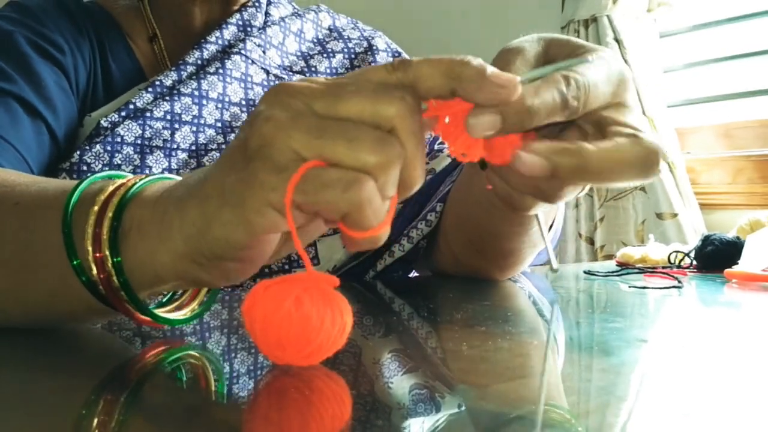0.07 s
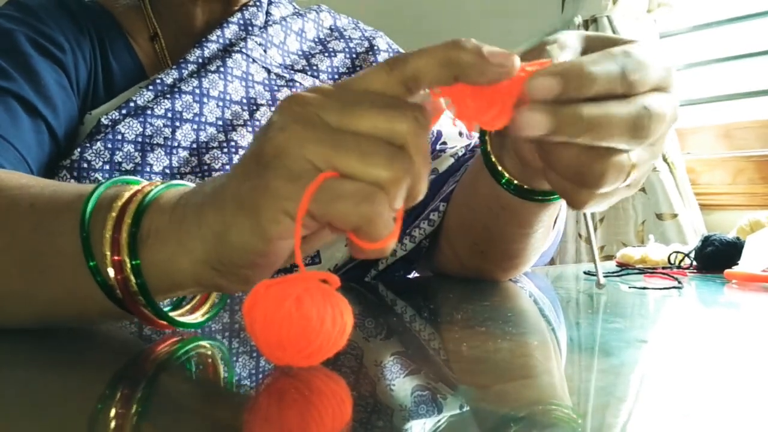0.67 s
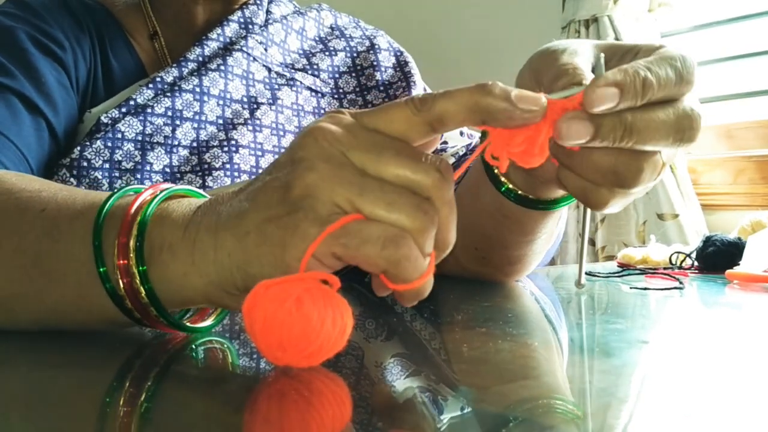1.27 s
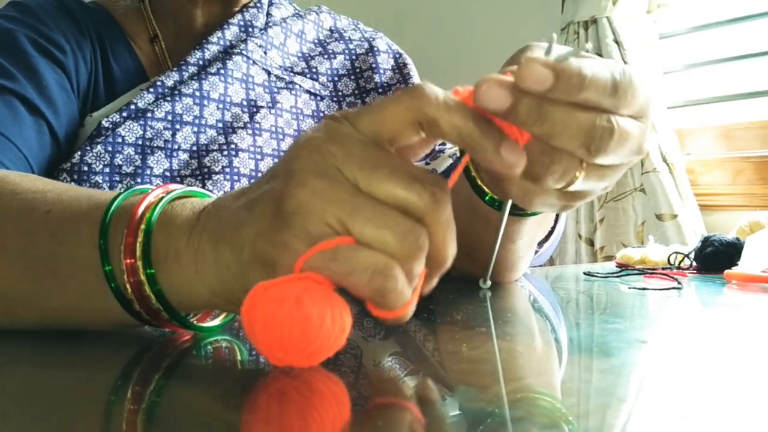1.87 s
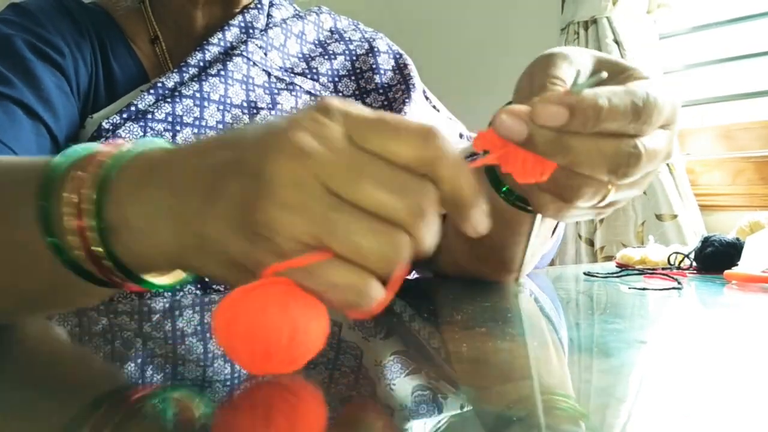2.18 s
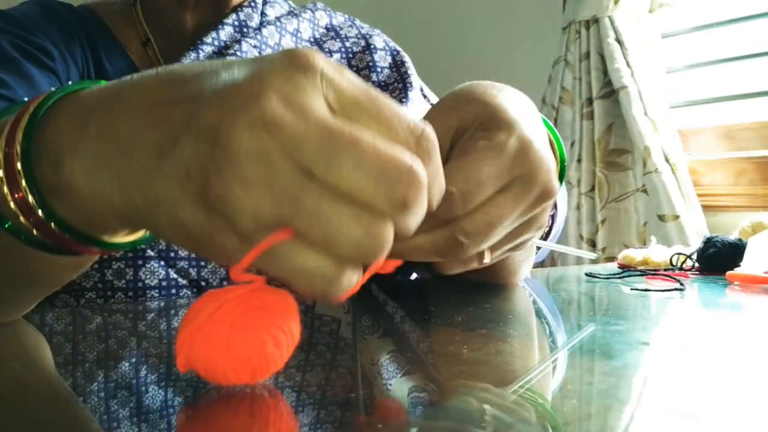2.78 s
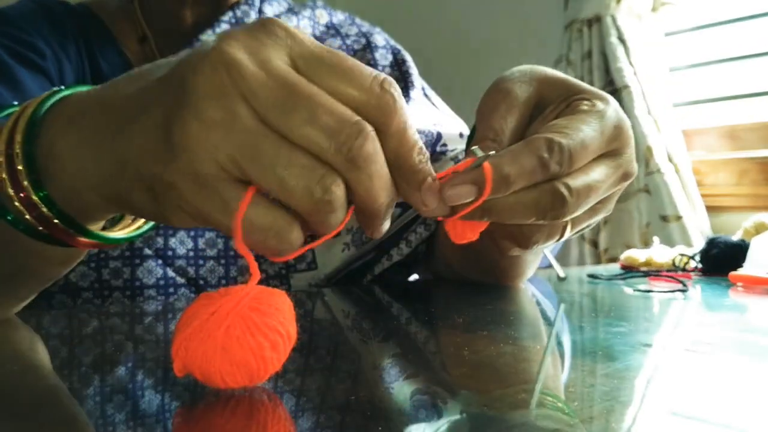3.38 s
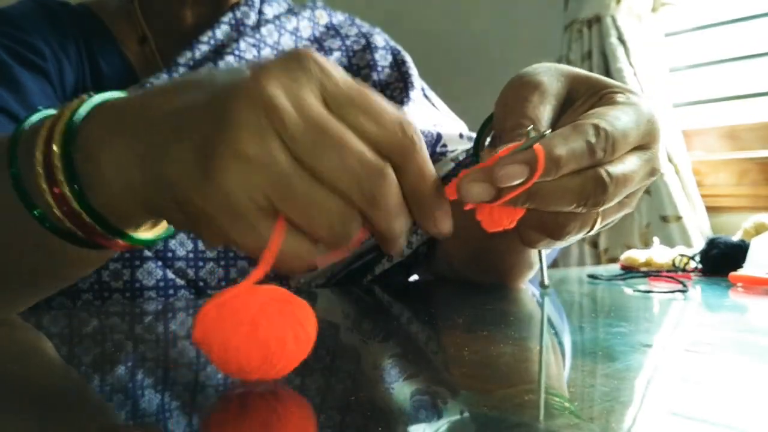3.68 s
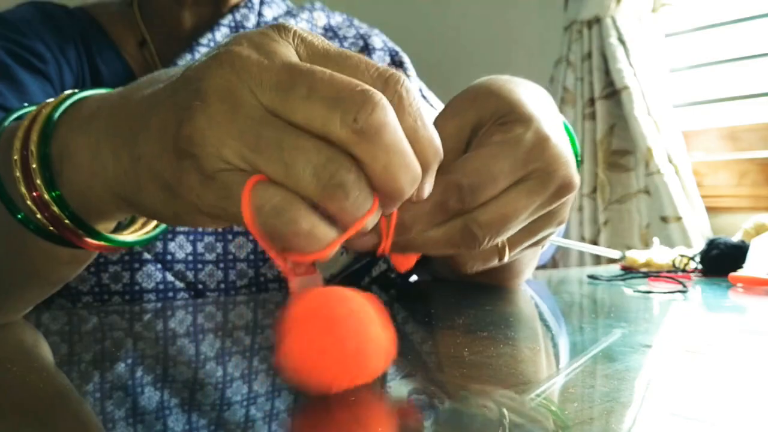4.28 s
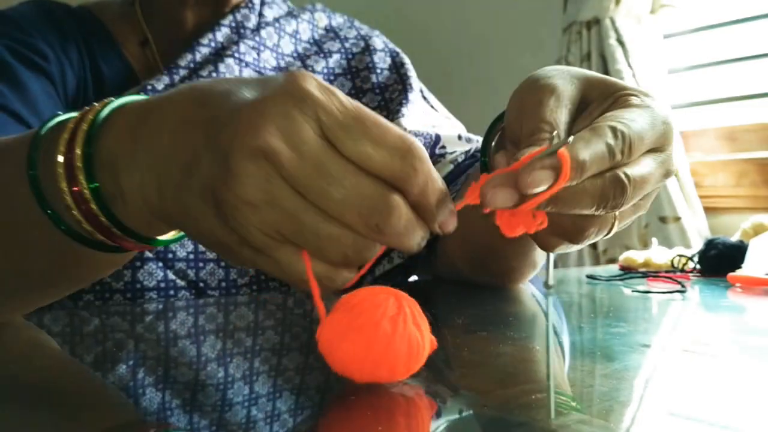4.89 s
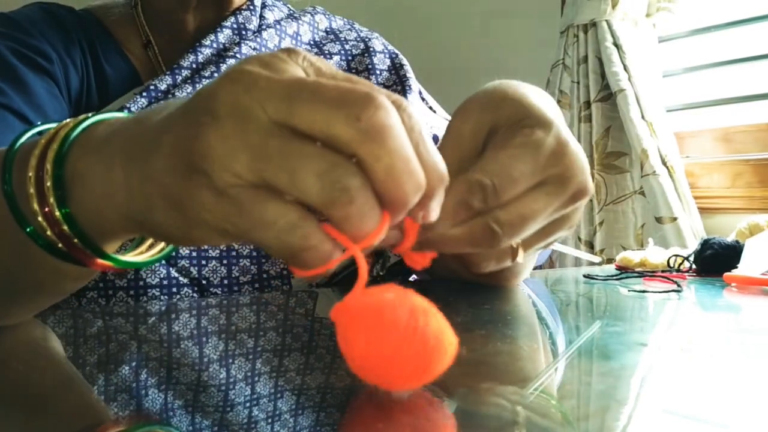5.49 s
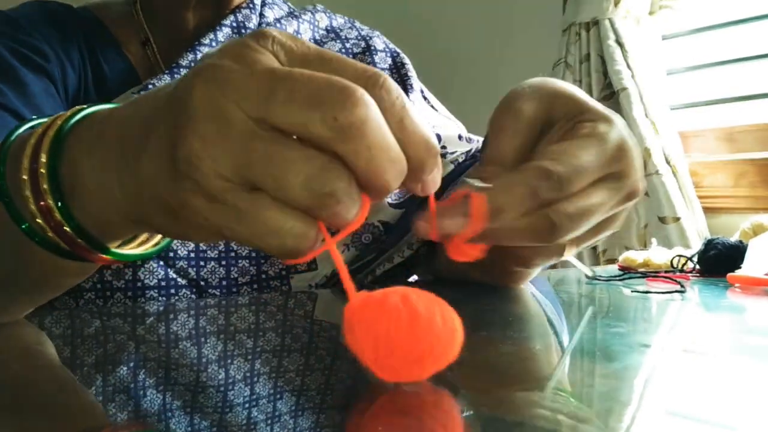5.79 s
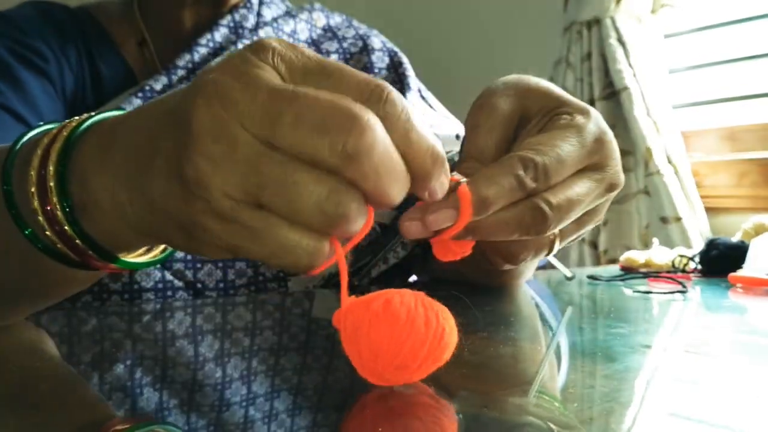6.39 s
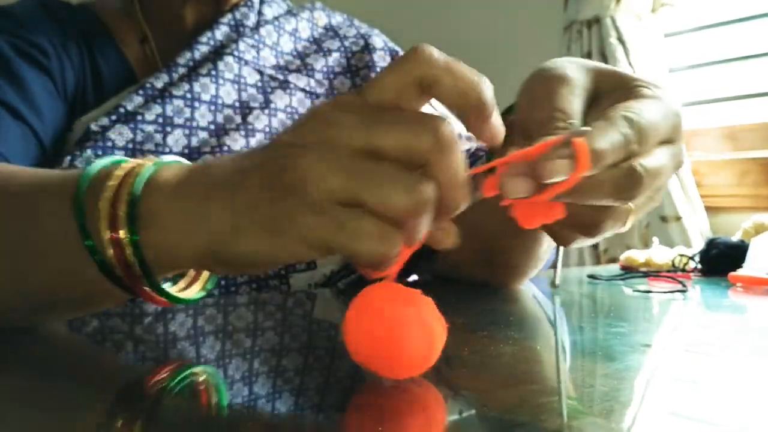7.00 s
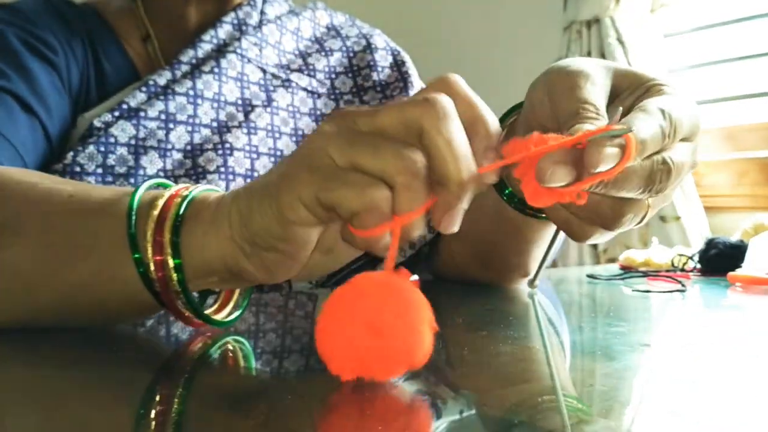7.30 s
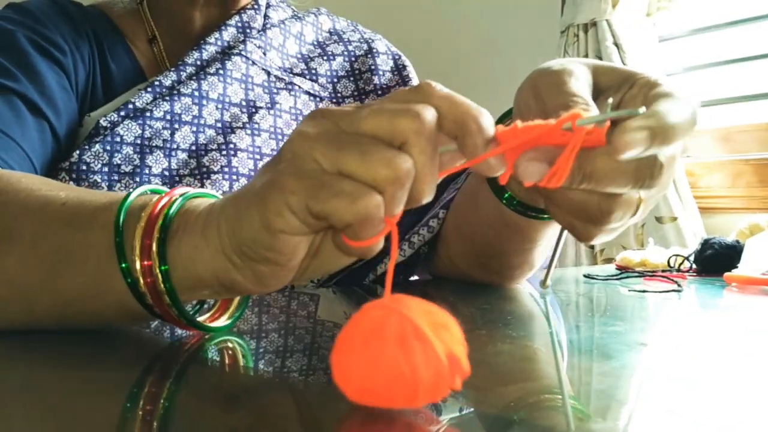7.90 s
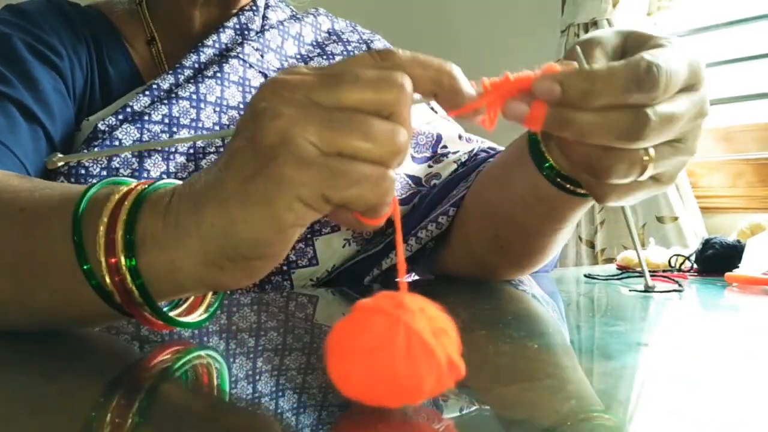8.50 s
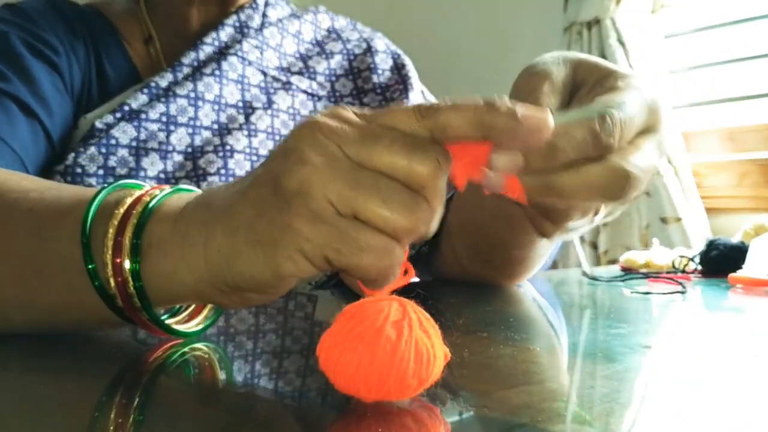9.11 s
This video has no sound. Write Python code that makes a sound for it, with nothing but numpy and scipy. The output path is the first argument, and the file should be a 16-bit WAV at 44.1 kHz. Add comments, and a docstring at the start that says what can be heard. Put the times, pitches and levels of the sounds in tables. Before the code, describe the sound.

In a small room, close to a phone microphone, knitting needles click together and tap a glass table at uneven intervals, each tap ringing briefly. Wool rustles faintly and glass bangles clink near two seconds. A low engine boom swells outside around three to four seconds, then recedes. An arm rubs the table with a soft, hollow drone, more taps follow, and the bangles clink again near the end as the street noise fades.

```python
"""Knitting needles tap a glass-topped table and click together in a small room, close to a phone.
Each tap sets needle and glass ringing. Stitches slide, wool rustles, glass bangles clink on both
wrists and an arm rubs over the table. Behind it a fan hums, an engine rumbles past outside and the
street noise ebbs away, along with a thin hiss and a few faint, hollow swells."""
import sys
import numpy as np
from scipy import signal
from scipy.fft import rfft, irfft, next_fast_len
from scipy.io import wavfile
from scipy.ndimage import uniform_filter1d

SR = 44100
rng = np.random.default_rng(int(sys.argv[2]) if len(sys.argv) > 2 else 0)


def put_to_file(sound):
    """Save the sound as 16-bit audio at rate SR, in the file named by the first command-line argument."""
    columns = np.atleast_2d(sound).T  # one column per channel
    safe = np.clip(columns, -1, 1)
    whole_steps = np.round(safe * 32767)
    wavfile.write(sys.argv[1], SR, whole_steps.astype(np.int16))


N = 407484
T = np.arange(N) / SR
AGE = np.arange(SR // 2) / SR  # seconds since a blow

# The tone of five noises. Each row: frequency in Hz, relative level in dB.
STREET_TONE = [(120, -9.5), (200, -19), (300, -21.5), (450, -21), (650, -23), (950, -23), (1400, -30),
               (2000, -32), (3000, -36), (4500, -46), (8000, -50)]
HISS_TONE = [(3000, -12.5), (6000, -9), (10000, -5), (13000, 1), (15500, -7.5)]
ROOM_TONE = [(25, -21), (48, -0.5), (120, 0), (200, 5), (420, -2), (650, -8.5), (1100, -13.5),
             (2000, -20.5), (5000, -31)]
RUMBLE_TONE = [(24, -32), (34, -10), (41, 7), (50, -8.5), (70, 1.5), (86, 6.5), (110, -3.5), (155, -10),
               (220, -27.5), (400, -60.5)]
TAP_TONE = [(300, -33), (600, -18.5), (1100, -19.5), (1500, -7), (2000, -18), (2700, -12.5), (3900, -5),
            (5200, -3.5), (7200, -2), (8300, -7), (12500, -5.5), (14800, -5.5), (15800, -12.5)]
# Drones in the street noise. Each row: pitch in Hz, width in Hz, level in dB relative to the street.
STREET_DRONES = [(428.5, 55, -9.5), (534.5, 24, -11.5)]
# The level of a low hum, which swells with the loudest engine boom, and of a thin hiss.
# Each row: time in seconds, level in dB before trimming.
HUM_LEVEL = [(0.0, -55), (1.9, -76), (2.6, -67.5), (2.81, -58), (3.73, -51.5), (4.25, -70.5), (5.58, -67),
             (7.57, -77), (8.18, -71), (9.24, -88.5)]
HISS_LEVEL = [(0.0, -77.5), (1.26, -85), (1.96, -81), (2.49, -84.5), (2.68, -78), (3.16, -83.5),
              (3.94, -83), (4.14, -82.5), (5.09, -88), (5.89, -81.5), (6.05, -86.5), (8.08, -87.5),
              (8.98, -89), (9.24, -86.5)]
# The engine slowing down. Each row: time in seconds, shaft turns per second.
ENGINE_SPEED = [(0.0, 29.3), (0.87, 30.1), (3.68, 29.9), (4.45, 28.4), (4.99, 25.0), (5.64, 25.0),
                (6.2, 25.8), (8.05, 24.5), (8.72, 22.6), (9.24, 22.6)]
# The tones of its drone. Each row: multiple of the shaft speed, relative level in dB.
ENGINE_TONES = [(2, -5.5), (3, 1), (4, -5.5)]
# Engine booms. Each row: peak time and length in seconds, firing tone and rumble levels in dB.
BOOMS = [(0.11, 0.66, -60, -65), (0.892, 0.71, -63, -70), (2.83, 0.37, -45, -53), (3.45, 1.055, -36, -50),
         (4.17, 0.43, -55.5, -67.5), (5.485, .42, -58.5, -61), (6.02, 0.27, -62.5, -61),
         (6.32, 0.3, -68, -73.5), (7.902, 0.31, -65.5, -73.5)]
# Needle tip on needle tip. Each row: start in seconds, shaft and tip levels in dB,
# brightest frequency in Hz, echo in dB relative to the click.
CLICKS = [(0.1288, -39, -25, 12760, -4.5), (0.58, -52.5, -43, 12900, -3), (0.6646, -54.5, -37.5, 12950, -9),
          (0.713, -56, -58, 11000, -3.5), (0.9426, -71.5, -71.5, 12000, 0.5), (7.627, -50, -35, 13340, -9),
          (8.502, -93, -71.5, 13230, 5)]
# Needle end on glass. Each row: start in seconds, bass, middle and treble levels in dB,
# echo in dB relative to the tap, brightest frequency in Hz.
TAPS = [(0.1299, -69, -45.5, -37, -4, 12420), (1.535, -91, -73.5, -60.5, -11.5, 10400),
        (2.531, -51, -45.5, -41.5, -4.5, 12710), (2.6069, -43, -39, -37, -11.5, 12970),
        (2.6258, -57, -48, -42.5, -2.5, 12460), (3.5672, -83, -66, -48, -3.5, 13100),
        (4.041, -56, -55, -44.5, -5, 12540), (4.2588, -48.5, -47, -33.5, -6, 13660),
        (4.7351, -83, -67, -52.5, -5, 13700), (5.5866, -57, -56.5, -49, 0, 12500),
        (5.8257, -40.5, -40, -28.5, -4, 12770), (6.314, -70.5, -70.5, -90, 5.5, 9800),
        (6.5752, -54, -48.5, -37, -1, 12900), (6.895, -72.5, -72, -68.5, -1.5, 12860),
        (6.9411, -70, -52, -40.5, -6.5, 11700), (7.1971, -68, -58.5, -53, -6, 10800),
        (7.54, -57.5, -49.5, -39.5, -2, 11000), (7.6367, -61, -53.5, -49.5, 0, 12700),
        (8.605, -68, -64, -64.5, 7.5, 10300), (9.0674, -57.5, -50.5, -41, -3, 11140)]
# The borders of a tap's bass, middle and treble, in Hz.
TAP_BAND_EDGES = (520, 2600, 9000, 16000)
# Needle and glass ringing together. Each row: pitch in Hz, relative level in dB, seconds to fade 60 dB.
TABLE_MODES = [(620, -11, 0.011), (896, -2, 0.03), (1140, 1.5, 0.006), (1417, 4.5, 0.0089),
               (1500, 4, 0.016), (1680, 1, 0.0061), (2200, -2, 0.02), (2710, -8.5, 0.017),
               (3240, -1.5, 0.011), (5670, -3, .03), (7200, -5.5, 0.023), (10460, 4, 0.051),
               (11170, 1, 0.049), (11700, -4.5, .045), (13160, 4.5, 0.075), (13750, -11, .035),
               (14800, -3, 0.034)]
# Hollow swells, with a narrow wool rustle at 3.65 s and the arm brushing the table at 4.98 s; then rustles.
# Each row: peak time and length in seconds, pitch in Hz, level in dB.
SWELLS = [(.28, 0.085, 910, -63.5), (2.15, 0.15, 905, -66.5), (2.34, .22, 900, -69.5),
          (3.5, .2, 450, -73.5), (3.649, 0.068, 1300, -75), (3.98, 0.065, 586, -71.5),
          (4.199, .06, 427, -69.5), (4.977, 0.21, 784, -74.5), (8.058, 0.15, 320, -74),
          (8.769, 0.052, 390, -73)]
RUSTLES = [(0.348, 0.11, 2670, -78), (.53, 0.1, 1670, -74), (.72, 0.051, 1100, -69),
           (0.863, 0.047, 1800, -72), (1.66, 0.085, 1640, -72.5), (1.922, 0.073, 1530, -75),
           (4.634, 0.052, 1350, -79.5)]
# Stitches sliding on the needle. Each row: peak time in seconds, pitch in Hz, level in dB.
SLIDES = [(0.739, 7800, -72), (1.65, 6400, -72.5), (1.949, 6800, -66.5), (2.739, 6560, -68.5),
          (3.65, 6130, -73), (4.641, 5835, -80), (5.68, 6400, -70.5), (6.4, 5650, -78.5),
          (6.679, 5870, -75.5), (7.39, 5630, -88.5), (8.1, 6860, -77.5), (8.66, 6000, -70.5)]
# Bangles, one list per wrist. Each row: pitch in Hz, relative level in dB, seconds to fade 60 dB.
BANGLE_MODES = [
    [(9580, -12, .07), (10430, 0, .06), (12130, -10, .1), (12840, -7, .12), (15250, -5, .08),
     (15384, 3, .09)],
    [(10040, 1, .13), (11120, -6, .11), (12900, -2, .06), (14200, 0, .035), (15130, -5, .06),
     (15400, -3, .06)],
]
# Bangle on bangle. Each row: start in seconds, tick and ring levels in dB,
# brightest frequency in Hz, wrist 0 or 1.
CLINKS = [(1.866, -83, -69, 10600, 0), (1.896, -56, -51, 10800, 0), (1.9117, -46.5, -46, 10500, 0),
          (1.954, -56, -34.5, 15600, 0), (1.973, -43.5, -67, 13300, 0), (8.0345, -61, -63.5, 13800, 1),
          (8.0807, -45, -52.5, 14000, 1), (8.164, -54.5, -63, 13400, 1), (8.2236, -71, -80.5, 15300, 1),
          (8.2863, -64, -73, 14100, 1), (9.07, -43, -49, 14940, 0)]
# A faint, narrow ring, once just after the loud double tap and once later.
# Each row: peak time and length in seconds, level in dB.
FAINT_RINGS = [(2.661, 0.15, -66), (4.651, 0.042, -81)]
# The table's hollow resonances. Each row: pitch in Hz, width in Hz, relative level in dB.
TABLE_BODY = [(355, 53, -10), (443.6, 19, 3), (467, 24, -7.5), (542, 49, -8), (780, 220, -12.5)]
# Arm and wool ball brushing the table. Each row: peak time and length in seconds, gain in dB.
STROKES = [(5.148, 0.024, -58.5), (5.316, 0.066, -64.5), (5.473, 0.049, -55.5), (5.555, 0.028, -57.5),
           (5.626, 0.036, -53.5), (5.767, 0.093, -61), (5.899, 0.074, -57), (6.238, .05, -70.5),
           (6.98, 0.04, -81), (7.225, 0.077, -76), (7.359, 0.018, -67), (7.531, 0.025, -74),
           (7.745, 0.022, -71)]

STREET_DB = -68  # where the street starts, before any surge


def undb(db):
    """Turn decibels into a gain to multiply by."""
    return 10 ** (np.asarray(db) / 20)


def unit(x):
    """Scale a sound to an average (rms) level of 1."""
    return x / np.sqrt(np.mean(x ** 2))


def blow_level(x, db, first_s=.012):
    """Scale a blow so that its first moments have this average level."""
    return x * undb(db) / np.sqrt(np.mean(x[:int(first_s * SR)] ** 2))


def curve(table):
    """Join (seconds, value) points with straight lines."""
    return np.interp(T, *np.transpose(table))


def colour(x, points):
    """Give a sound the tone of (Hz, dB) points, keeping its attacks sharp."""
    size = next_fast_len(len(x) + 2048, True) * 2
    hz, db = np.transpose(points)
    bin_hz = np.arange(size // 2 + 1) * SR / size
    log_gain = np.log(undb(np.interp(np.log(bin_hz + 1), np.log(hz), db)))
    # keeping one half makes the filter ring only after a blow, never before it
    cepstrum = irfft(log_gain)[:size // 2]
    cepstrum[1:] *= 2
    return irfft(rfft(x, size) * np.exp(rfft(cepstrum, size)))[:len(x)]


def band(x, low_hz, high_hz, order=3):
    """Keep what lies between two frequencies."""
    edges = [max(low_hz, 10), min(high_hz, SR / 2 - 1000)]
    return signal.sosfilt(signal.butter(order, edges, "band", fs=SR, output="sos"), x)


def around(x, hz, width_hz, order=2):
    """Keep what lies near one frequency."""
    return band(x, hz - width_hz / 2, hz + width_hz / 2, order)


def drones(rows):
    """Steady, narrow noises, one for each (Hz, width in Hz, dB) row."""
    return sum(undb(db) * unit(around(rng.standard_normal(N), hz, width)) for hz, width, db in rows)


def wander(per_second):
    """A smooth random drift, about 1 in size."""
    step = int(SR / per_second)
    stairs = np.repeat(rng.standard_normal(N // step + 2), step)
    return unit(uniform_filter1d(uniform_filter1d(stairs, step), step)[:N])


def burst(t60):
    """Noise that fades by 60 dB in t60 seconds."""
    return rng.standard_normal(len(AGE)) * undb(-60 * AGE / t60)


def snap(contact_s):
    """The noise of a brief, glancing touch."""
    return rng.standard_normal(len(AGE)) * AGE / contact_s * np.exp(-AGE / contact_s)


def ring(modes, detune):
    """An object's own fading tones (modes); each blow lands elsewhere and shifts them a little."""
    out = np.zeros(len(AGE))
    for hz, db, t60 in modes:
        shifted_hz = hz * (1 + detune * rng.standard_normal())
        out += undb(db - 60 * AGE / t60) * np.sin(2 * np.pi * (shifted_hz * AGE + rng.random()))
    return out


def bell(t, length):
    """A smooth rise and fall around time zero."""
    return np.exp(-2 * (t / length) ** 2)


def add(track, s, sound):
    """Mix a sound into the track, starting at s seconds."""
    start = max(int(s * SR), 0)
    track[start:start + len(sound)] += sound[:N - start]


def in_room(blow, room_db, wall_share, t60=0.38, cutoff_s=0.103, gap_s=.004, wall_s=0.018):
    """A blow, one early echo and a short noisy tail that is cut off quickly."""
    tail = burst(t60) * np.exp(-(AGE / cutoff_s) ** 3 / 2) * np.minimum(AGE / gap_s, 1) ** 2
    tail /= np.sqrt(np.sum(tail ** 2))
    tail[int(wall_s * SR)] += wall_share
    return blow + undb(room_db) * signal.fftconvolve(blow, tail)[:len(blow)]


def swishes(rows, grain_db):
    """Short bands of noise that swell and fade with an uneven grain."""
    out = np.zeros(N)
    for peak_s, length, db, hz, width_hz in rows:
        noise = unit(around(rng.standard_normal(len(AGE)), hz, width_hz))
        add(out, peak_s - AGE.mean(), noise * undb(db) * bell(AGE - AGE.mean(), length))
    return out * undb(grain_db * wander(150))


def street_level(arches, ebb_db=20, ebb_s=9.2, surge_db=2.5):
    """The street's level in dB: it sinks ever faster, and surges with each engine boom."""
    return STREET_DB - ebb_db * (T / ebb_s) ** 1.37 + surge_db * np.sqrt(np.max(arches, axis=0))


def street_noise(street_db, flicker_db=1.8):
    """The street outside: eight bands of noise, each wavering alone, and two narrow drones."""
    edges_hz = np.geomspace(100, 9000, num=9)
    noise = sum(band(rng.standard_normal(N), low, high) * undb(flicker_db * wander(9))
                for low, high in zip(edges_hz, edges_hz[1:]))
    noise = colour(noise, STREET_TONE)
    noise /= np.std(band(noise, 160, 3900))
    return (noise + drones(STREET_DRONES)) * undb(street_db)


def low_hum(hz=106.7, waver=0.0056, trim_db=-1.56, wander_db=1.5):
    """One low, slightly unsteady tone that swells and fades."""
    phase = 2 * np.pi * np.cumsum(hz * (1 + waver * wander(5.6))) / SR
    return unit(np.sin(phase)) * undb(curve(HUM_LEVEL) + trim_db + wander_db * wander(5.3))


def thin_hiss(trim_db=2, wander_db=1.0):
    """A high hiss that drifts up and down in level."""
    noise = unit(colour(rng.standard_normal(N), HISS_TONE))
    return noise * undb(curve(HISS_LEVEL) + trim_db + wander_db * wander(16))


def room_tone(db=-81):
    """The room's own low, steady noise."""
    return unit(colour(rng.standard_normal(N), ROOM_TONE)) * undb(db)


def boom_arch(peak_s, length, sag_db=10.5, fall_db_per_s=161.5):
    """The gain of one engine boom: a broad arch with steep sides."""
    away_s = np.abs(T - peak_s)
    top_db = -sag_db * np.minimum(2 * away_s / length, 1) ** 2
    return undb(top_db - fall_db_per_s * np.maximum(away_s - length / 2, 0))


def engine(arches, street_db, waver=.005, rumble_db=-76.5, drone_db=-69.5, ebb_share=.6, flutter_db=1.5):
    """A far engine slows and moves away; at times its firing tone and rumble boom through the walls."""
    shaft_hz = curve(ENGINE_SPEED) * (1 + waver * wander(6.3))
    phase = 2 * np.pi * np.cumsum(shaft_hz) / SR
    receding = undb(ebb_share * (street_db - STREET_DB))
    drone = sum(undb(drone_db + db + flutter_db * wander(5.6)) * unit(np.sin(multiple * phase))
                for multiple, db in ENGINE_TONES)
    firing_gain, rumble_gain = 0, receding * undb(rumble_db)
    for arch, (_, _, firing_db, low_db) in zip(arches, BOOMS):
        firing_gain = np.maximum(firing_gain, arch * undb(firing_db))
        rumble_gain = np.maximum(rumble_gain, arch * undb(low_db))
    rumble = unit(band(colour(rng.standard_normal(N), RUMBLE_TONE), 26, 400))
    return drone * receding + unit(np.sin(2 * phase)) * firing_gain + rumble * rumble_gain


def needle_clicks(contact_s=0.00079):
    """One tip slips off the other: a very short, bright snap, damped by the fingers."""
    out = np.zeros(N)
    for s, shaft_db, tip_db, hz, room_db in CLICKS:
        slip = snap(contact_s)
        tip = blow_level(around(slip, hz, width_hz=1600), db=0)
        tip += blow_level(band(snap(contact_s), 9570, 15500), db=-3)
        shaft = band(slip, 6000, 9000)
        click = blow_level(tip, tip_db) + blow_level(shaft, shaft_db)
        add(out, s, in_room(click, room_db, wall_share=.15))
    return out


def needle_taps(bounce_s=0.0018, bounce_db=(-2, 0, -4, -7, -6), spread_db=3):
    """The needle's free end chatters on the glass; both ring and the table top scatters the sound."""
    out = np.zeros(N)
    for s, bass_db, middle_db, treble_db, room_db, bright_hz in TAPS:
        chatter = np.zeros(len(AGE))
        for k, db in enumerate(bounce_db):
            delay = int(k * bounce_s * SR * rng.uniform(.85, 1.15))
            chatter += undb(db) * np.roll(burst(t60=.0035), delay)
        scatter = blow_level(burst(t60=0.11), db=-4)
        crack = colour(blow_level(chatter, db=0) + scatter, TAP_TONE)
        # each spot on the glass favours other tones
        modes = [(hz, db + spread_db * rng.standard_normal(), t60) for hz, db, t60 in TABLE_MODES]
        blow = blow_level(crack, db=0) + blow_level(ring(modes, detune=0.014), db=-8)
        # the grip decides where the tap is brightest, and its share of bass, middle and treble
        blow += around(blow, bright_hz, width_hz=2200, order=1)
        blow += around(blow, hz=1480, width_hz=420, order=1)  # the pane's hollow knock
        ranges = zip(TAP_BAND_EDGES, TAP_BAND_EDGES[1:], (bass_db, middle_db, treble_db))
        bass, middle, treble = (blow_level(band(blow, low, high), db) for low, high, db in ranges)
        add(out, s, in_room(bass, room_db - 3, wall_share=0.58))
        add(out, s, in_room(middle + treble, room_db, wall_share=0.16))
    return out


def hollow_swells(width_share=.19):
    """Faint, narrow noises come and go."""
    return swishes([(s, length, db, hz, width_share * hz) for s, length, hz, db in SWELLS], grain_db=2.5)


def wool_rustles(width_hz=880):
    """Wool and sleeves rustle with a rough grain."""
    return swishes([(s, length, db, hz, width_hz) for s, length, hz, db in RUSTLES], grain_db=4)


def stitch_slides(slide_s=0.087, slide_width_hz=1970, ring_hz=5340, ring_width_hz=110):
    """Stitches hiss along the needle; twice a faint, narrow ring is heard as well."""
    slides = [(s, slide_s, db, hz, slide_width_hz) for s, hz, db in SLIDES]
    rings = [(s, length, db, ring_hz, ring_width_hz) for s, length, db in FAINT_RINGS]
    return swishes(slides + rings, grain_db=1.5)


def bangles(reach_hz=3200):
    """Glass bangles knock together: a tick, then their tones nearest the tick's pitch ring on."""
    out = np.zeros(N)
    for s, tick_db, ring_db, bright_hz, wrist in CLINKS:
        modes = [(hz, db - 10 * np.log10(1 + ((hz - bright_hz) / reach_hz * 2) ** 2), t60)
                 for hz, db, t60 in BANGLE_MODES[wrist]]
        knock = snap(contact_s=0.0021)
        tick = blow_level(around(knock, bright_hz, width_hz=1000), db=0)
        tick += blow_level(band(knock, 7600, 21000), db=-10)
        # the stacked bangles are nearly alike, so their tones shimmer against each other
        glass = band(ring(modes, detune=0.0014) + 0.25 * ring(modes, detune=0.0057), 5400, 17000)
        add(out, s, in_room(blow_level(tick, tick_db), room_db=-11, wall_share=.2))
        add(out, s, in_room(blow_level(glass, ring_db), room_db=-6, wall_share=.2))
    return out


def table_rub(lean_from_s=4.85, lean_to_s=7.9, edge_s=0.061, lean_db=-82, uneven_db=3, scuff_db=-17):
    """Arm and wool ball scuff the table and make it drone faintly at its own pitches."""
    drone = drones(TABLE_BODY)
    # friction holds the vibration at a size set by the pressure
    drone /= np.sqrt(uniform_filter1d(drone ** 2, size=2000))
    scuff = undb(scuff_db) * unit(around(rng.standard_normal(N), hz=820, width_hz=400))
    # the resting arm rubs lightly between strokes
    leaning = np.clip(np.minimum(T - lean_from_s, lean_to_s - T) / edge_s, 0, 1)
    resting = undb(lean_db + uneven_db * wander(14)) * leaning
    strokes = sum(undb(db) * bell(T - s, length) for s, length, db in STROKES)
    return (drone + scuff) * (resting + strokes)


def scene():
    """The knitting and its background, mixed into one channel."""
    hands = needle_taps() + needle_clicks() + bangles() + stitch_slides() + wool_rustles() + table_rub()
    arches = [boom_arch(s, length) for s, length, _, _ in BOOMS]
    street_db = street_level(arches)
    background = hollow_swells() + engine(arches, street_db) + street_noise(street_db)
    background += thin_hiss() + low_hum() + room_tone()
    return (hands + background)[None]


def record(dry, top_hz=15600):
    """The phone cuts off the highest treble."""
    return signal.sosfilt(signal.ellip(10, .2, 70, top_hz, fs=SR, output="sos"), dry)


dry = scene()
out = record(dry)
put_to_file(out)
```